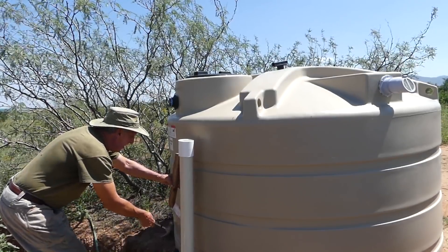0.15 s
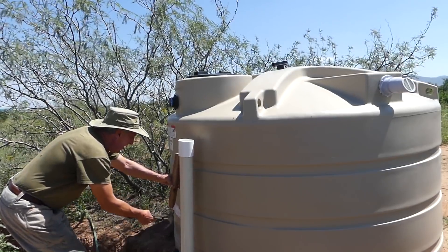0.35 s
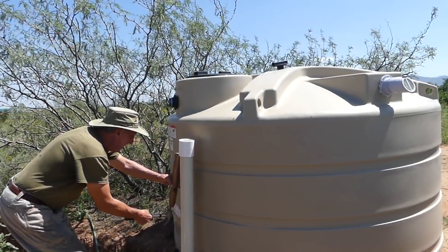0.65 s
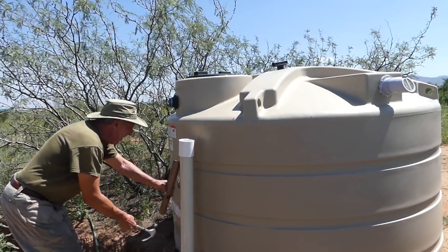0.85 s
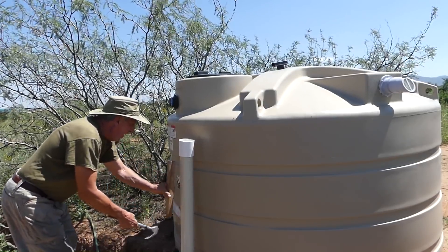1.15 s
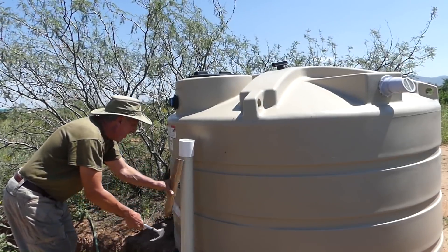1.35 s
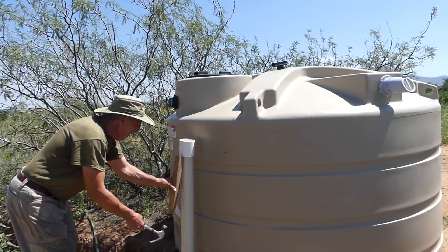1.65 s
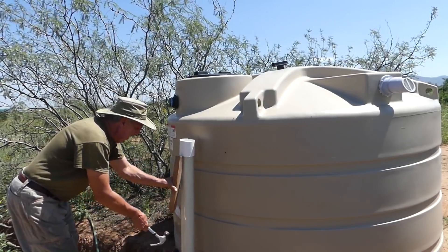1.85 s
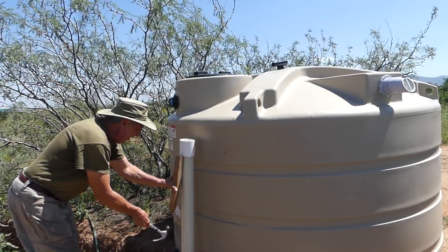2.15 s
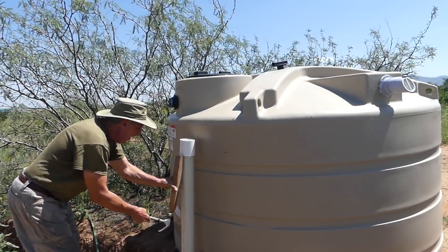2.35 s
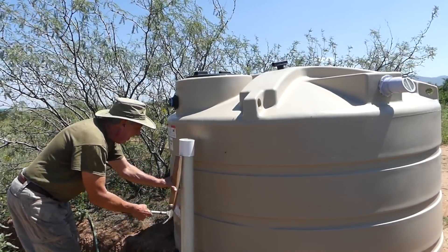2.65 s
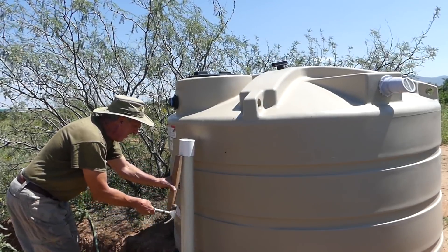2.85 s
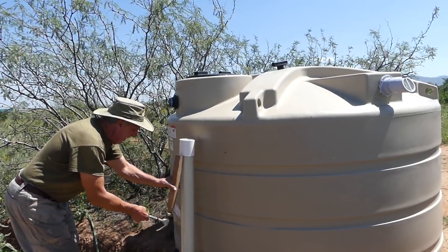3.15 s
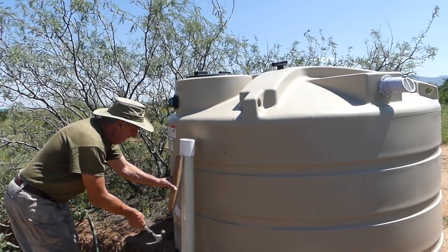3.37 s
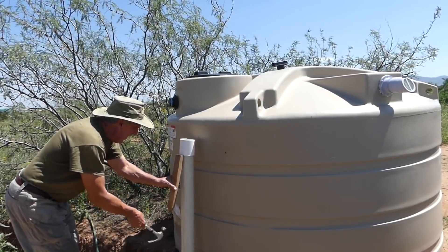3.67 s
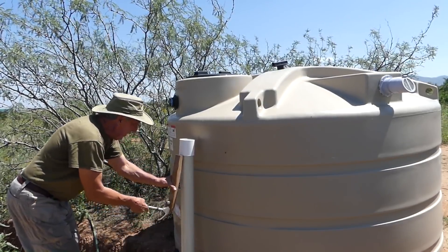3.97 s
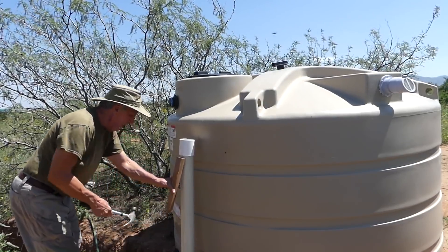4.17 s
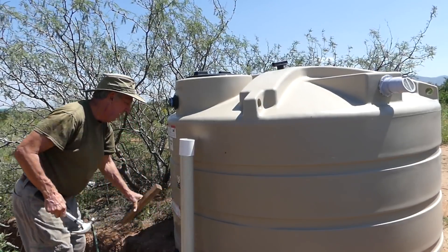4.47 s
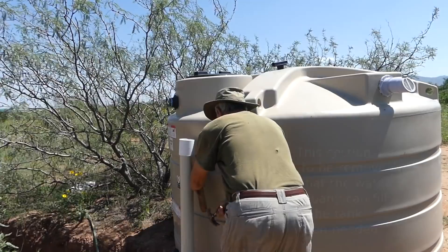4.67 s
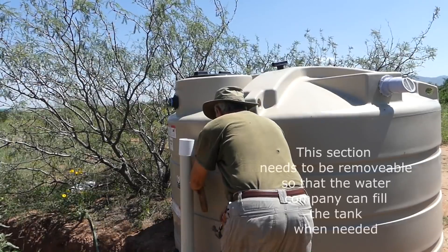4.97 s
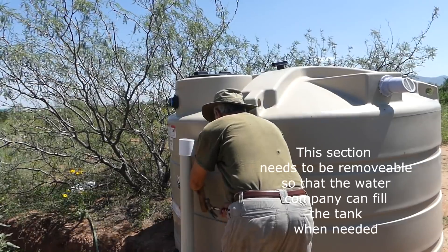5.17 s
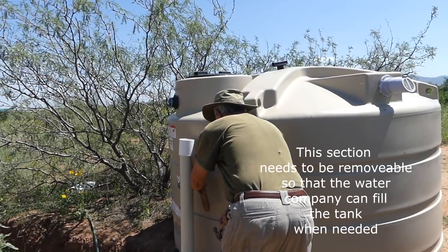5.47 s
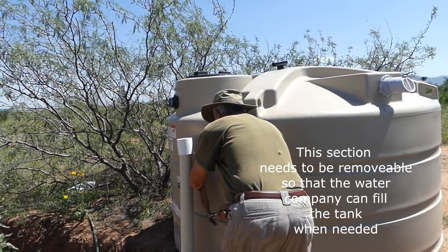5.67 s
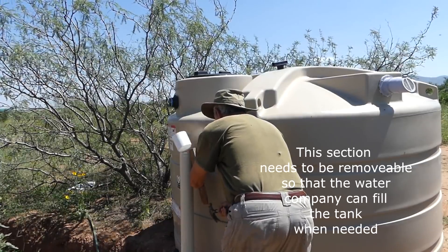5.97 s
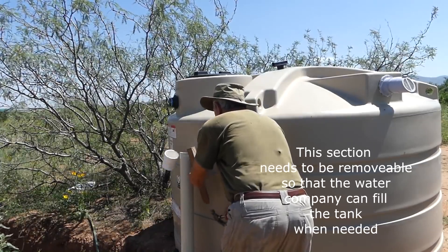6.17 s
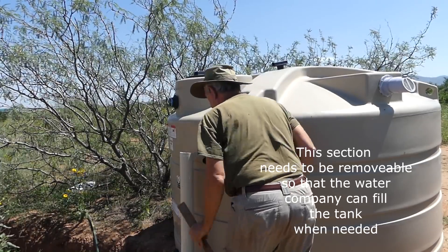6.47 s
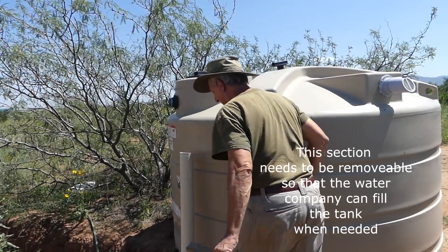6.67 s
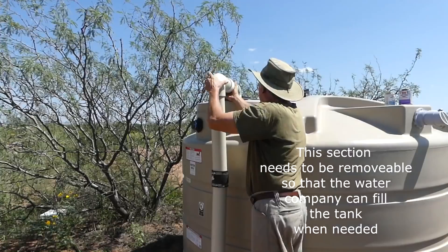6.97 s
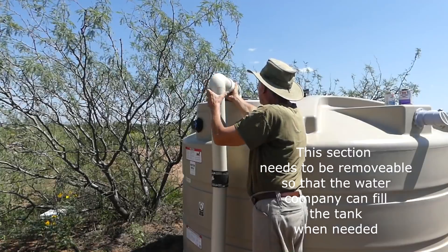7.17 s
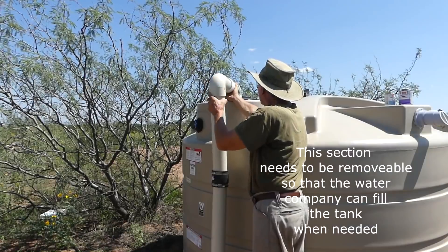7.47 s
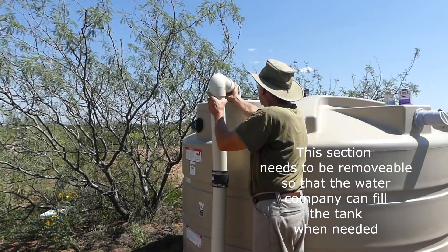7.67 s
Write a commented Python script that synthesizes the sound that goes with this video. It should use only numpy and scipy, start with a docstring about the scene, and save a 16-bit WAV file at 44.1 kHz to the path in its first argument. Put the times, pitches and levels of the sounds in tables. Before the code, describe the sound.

Hard hollow knocks on a plastic pipe outdoors, unevenly spaced with lighter taps between, over low wind rumble; a thud and clatter follow later.

```python
"""Knocking a stuck pipe fitting

Outdoors a hammer knocks a wooden block against a plastic pipe fitting beside a water tank.
Each blow adds short noises to ringing tones, and bright, thin echoes follow. Lighter taps fall between.
Boots scuff and things land, built from thuds and noise; wind, brush and ticks are shaped noise.
All this is in the left channel; the right holds little but hiss.
"""
import sys
import numpy as np
from scipy import signal
from scipy.fft import rfft, irfft, next_fast_len
from scipy.io import wavfile
from scipy.ndimage import uniform_filter1d, minimum_filter1d, map_coordinates

SR = 44100
rng = np.random.default_rng(int(sys.argv[2]) if len(sys.argv) > 2 else 0)


def put_to_file(sound):
    """Save the sound as 16-bit audio at rate SR, in the file named by the first command-line argument."""
    columns = np.atleast_2d(sound).T  # one column per channel
    safe = np.clip(columns, -1, 1)
    whole_steps = np.round(safe * 32767)
    wavfile.write(sys.argv[1], SR, whole_steps.astype(np.int16))


N = 345072
CLOCK = np.arange(N) / SR  # time through the whole scene, in seconds
AGE = np.arange(SR // 4) / SR  # time since a hit, in seconds

# Strength of the wind on the microphone. Each row: time in seconds, level in dB before BUFFET_DB.
WIND_LEVEL = [(0.0, -39.5), (0.15, -46), (1.48, -40.5), (2.26, -56), (2.46, -38.5), (2.5, -51),
              (3.33, -43.5), (3.59, -46), (4.14, -41.5), (4.22, -52.5), (4.66, -54.5), (4.81, -38.5),
              (5.27, -55.5), (5.38, -46), (5.71, -61), (6.32, -58), (6.51, -41), (6.93, -43.5), (7.01, -56),
              (7.82, -56.5)]
# Strength of the rustling. Each row: time in seconds, level in dB before each layer's own offset.
RUSTLE_LEVEL = [(0.0, -60.5), (3.05, -64), (3.55, -63.5), (4.51, -57), (4.73, -61), (6.27, -63),
                (6.64, -58.5), (7.01, -63.5), (7.82, -65)]
BUFFET_DB, BRUSH_DB = 10, 9.5  # added to the two curves above
# Colour of the wind on the microphone. Each row: frequency in Hz, relative level in dB per Hz.
BUFFET_COLOUR = [(8, -2.5), (22, 0), (45, -7), (90, -14), (160, -23.5), (280, -38), (600, -65.5),
                 (2000, -82)]
# Colour of the rustling brush. Each row: frequency in Hz, relative level in dB per Hz.
LEAVES_COLOUR = [(60, 2), (250, 1.5), (450, -1.5), (800, -5), (1200, -8.5), (2500, -14), (5500, -18),
                 (9000, -24), (16000, -31)]
# Colour of the hiss. Each row: frequency in Hz, relative level in dB per Hz.
HISS_COLOUR = [(20, -9), (400, -5.5), (1200, -10.5), (3000, -12.5), (6000, -12), (10000, -8), (14800, -5),
               (16000, -2.5)]
TOP_HZ = 15900  # nothing is left above this

# Blows and light taps on the fitting. Each row: start in seconds, contact pitch in Hz, contact level in dB,
# body centre in Hz, body level in dB, pipe wall level in dB, crack level in dB.
KNOCKS = [(0.2624, 1520, -26, 625, -21, -21.5, -30.5), (0.572, 1640, -17, 820, -22.5, -18.5, -22.5),
          (1.2783, 1340, -62, 690, -42, -61, -63), (1.4159, 1140, -73, 686, -51.5, -69, -70),
          (1.517, 890, -57, 590, -48, -65, -68), (1.9882, 1330, -19, 606, -22.5, -28.5, -30),
          (2.33, 1350, -17, 734, -24.5, -27, -29), (2.6656, 1020, -48.5, 805, -41, -54.5, -51.5),
          (3.176, 1400, -15, 910, -24.5, -24, -28.5), (3.4946, 1270, -23.5, 950, -22, -30, -26),
          (3.819, 1160, -57, 750, -47, -47, -54), (3.9237, 860, -43.5, 830, -42.5, -62, -63),
          (4.7212, 840, -65, 626, -43.5, -47, -60), (5.598, 910, -23.5, 837, -20, -25.5, -28.5),
          (5.9547, 1460, -30, 820, -21.5, -25.5, -24.5)]
# Low modes of the pipe. Each row: nominal pitch in Hz, relative level in dB,
# time to fall by 60 dB in seconds.
THUMP_MODES = [(179.6, -9.5, 0.1), (291, -7, 0.079), (366, 0, 0.077)]
THUMP_DB, THUMP_DB_PER_OCTAVE = -10, -6.5  # thump against the body; it weakens as the body's centre rises
MIDDLE_HZ = 738  # body centre of a blow in the middle of the block
# Block, fitting and pipe ringing together, before the tilt of each blow. Each row: nominal pitch in Hz,
# relative level in dB, time to fall by 60 dB in seconds.
BODY_MODES = [(519, 1.5, 0.075), (627.4, -12, 0.1), (716.3, -5, 0.082), (782, -5.5, 0.05), (881, -3, 0.046),
              (1057, -8.5, 0.07), (1214, 0, 0.0555), (1477, -11.5, .05), (1600, -23, 0.042),
              (1896, -11, 0.036)]
# Hollow noise of the body, before the same tilt. Each row: frequency in Hz, relative level in dB per Hz.
HOLLOW_COLOUR = [(150, -21.5), (400, -6), (600, 5.5), (1300, 2.5), (2050, -5), (2400, -21), (4000, -52.5)]
# Modes of the pipe wall. Each row: nominal pitch in Hz, relative level in dB,
# time to fall by 60 dB in seconds.
WALL_MODES = [(2553, 4, 0.039), (2633, 1, 0.067), (2750, 2.5, 0.045), (2935, -8, 0.04), (3076, -10, 0.023)]
# Broad ring of the pipe wall. Each row: frequency in Hz, relative level in dB per Hz.
SHELL_COLOUR = [(1700, -13), (2350, -5.5), (2700, 13), (3100, 0.5), (3700, -21.5)]
# Bright crack of a blow. Each row: frequency in Hz, relative level in dB per Hz.
CRACK_COLOUR = [(1500, -38), (3100, -1.5), (3900, -4.5), (4700, 1), (5300, 0), (5800, -0.5), (6500, 1.5),
                (7300, -9.5), (10000, -21.5), (16000, -45)]
# First snap of a hard blow. Each row: frequency in Hz, relative level in dB per Hz.
SNAP_COLOUR = [(600, -19.5), (1900, 15), (4000, -9), (7000, -6.5), (10000, -8.5), (16000, -32)]
# High modes of the rim. Each row: nominal pitch in Hz, relative level in dB,
# time to fall by 60 dB in seconds.
RIM_MODES = [(4620, 2.5, 0.036), (5250, -17.5, .04), (5720, -1.5, 0.048), (5960, -7, 0.056),
             (6100, -6.5, 0.051)]
# Colour of the echoes. Each row: frequency in Hz, relative level in dB.
ECHO_COLOUR = [(500, -4.5), (1500, -13.5), (3200, -3.5), (4600, -7.5), (5900, 5), (6600, -3), (8000, -7),
               (16000, -11)]

# Steps, things landing on the dirt, and one low wind thump at the start. Each row: start in seconds,
# thud pitch in Hz, thud level in dB, clatter level in dB, grit level in dB,
# base decay time in seconds that each part stretches or shortens.
LANDINGS = [(0.472, 181.8, -33, -62.5, -78, 0.14), (4.43, 337, -35.5, -46.5, -57, 0.085),
            (4.4545, 340, -50, -39.5, -44, 0.11), (4.493, 332, -42, -50.5, -50.5, 0.089),
            (6.461, 300, -77, -54, -49, 0.009), (6.596, 253, -31, -40, -35, 0.033),
            (6.603, 236, -26.5, -20, -25.5, 0.032)]
# Colour of a thud. Each row: multiple of its pitch, relative level in dB per Hz.
THUD_COLOUR = [(.3, -11), (.6, -4.5), (.8, -8), (1.25, 0), (1.9, -3.5), (3.998, -48)]
# Clatter of dropped things and scraping soles. Each row: frequency in Hz, relative level in dB per Hz.
CLATTER_COLOUR = [(300, -24), (600, -5), (820, 3), (1150, -2), (1450, -12), (1800, -9), (2250, -6.5),
                  (3100, -23.5), (6000, -50)]
# Fine grit. Each row: frequency in Hz, relative level in dB per Hz.
GRIT_COLOUR = [(1200, -19), (2700, -9), (3900, -3.5), (5600, -3), (6800, -9.5), (8000, -23.5), (16000, -23)]
# Boots dragging over dry dirt. Each row: start in seconds, time until release in seconds, grit level in dB,
# scrape level in dB.
SCUFFS = [(4.465, .095, -60, -53), (4.581, .03, -53.5, -60), (4.625, 0.041, -50.5, -58),
          (6.458, 0.045, -54, -55), (6.521, 0.028, -57, -44), (6.564, 0.03, -59, -52),
          (6.79, .03, -60.5, -54)]
SCUFF_ATTACK_S, SCUFF_RELEASE_S = 0.015, .01  # the sole bites, then lifts


def amp(db):
    """Turn decibels into a gain."""
    return 10 ** (np.asarray(db) / 20)


def unit(x):
    """Scale a steady sound to an average (rms) strength of 1."""
    return x / np.sqrt(np.mean(x ** 2) + 1e-20)


def blow(x):
    """Scale a hit so its whole energy equals 30 ms of sound at rms 1."""
    return x / np.sqrt(np.sum(x ** 2) / (.03 * SR) + 1e-20)


def curve(rows):
    """Join (seconds, value) rows with straight lines, one value per sample."""
    return np.interp(CLOCK, *np.transpose(rows))


def wobble(rate):
    """Make a smooth random curve through `rate` random points a second."""
    points = rng.standard_normal(int(N * rate / SR) + 4)
    return map_coordinates(points, [CLOCK * rate])


def noise(spectrum, size):
    """Make noise of rms 1, coloured by (Hz, dB) rows."""
    m = next_fast_len(size + 8192)
    hz, db = np.transpose(spectrum)
    log_hz = np.log(np.fft.rfftfreq(m, 1 / SR) + 1)
    gain = amp(np.interp(log_hz, np.log(hz), db))
    coloured = irfft(rfft(rng.standard_normal(m)) * gain, m)
    return unit(coloured[:size])


def fade(t60):
    """Die away freely after a contact, falling 60 dB in t60 seconds."""
    return np.exp(-np.log(1000) * AGE / t60)


def rise(attack):
    """Swell up at the start of a contact, with a time constant in seconds."""
    return 1 - np.exp(-AGE / attack)


def add(track, s, x):
    """Mix x into the track at time s in seconds."""
    part = track[round(s * SR):][:len(x)]
    part += x[:len(part)]


def wind():
    """Gusts buffet the microphone as low noise; brush rustles with its own brighter noise."""
    gusts = unit(noise(BUFFET_COLOUR, N) * amp(2.5 * wobble(18)))
    buffet = amp(curve(WIND_LEVEL) + BUFFET_DB) * gusts
    brush_gain = amp(curve(RUSTLE_LEVEL) + BRUSH_DB + 1.5 * wobble(25))
    return buffet + brush_gain * noise(LEAVES_COLOUR, N)


def rustles(count=130):
    """Clothes and twigs give scattered ticks of narrow noise, following the rustle level."""
    out, level = np.zeros(N), curve(RUSTLE_LEVEL)
    for when, pitch, size in rng.random((count, 3)):
        hz = 550 * 5 ** pitch
        colour = [(hz / 2, -25), (hz, 0), (hz * 2, -20)]
        tick = blow(noise(colour, len(AGE)) * rise(0.0011) * fade(.03))
        tick_db = level[int(when * N)] - 7.5 + 15 * size ** 2 - 4 * pitch  # higher ticks are weaker
        add(out, when * N / SR, amp(tick_db) * tick)
    return out


def ring(modes, scatter_db):
    """Damped modes, struck at new strengths; each pitch wavers slightly at random, for a rougher ring."""
    hz, db, t60 = np.transpose(modes)[:, :, None]
    size, phase, detune = rng.standard_normal((3, len(modes), 1))
    knots = np.arange(0, 1, 1 / 150)
    drifts = rng.standard_normal((len(modes), len(knots)))
    waver = np.array([np.interp(AGE, knots, row) for row in drifts])
    waver_cycles = .2 * np.minimum(hz / 2700, 1) * waver  # lower modes waver less
    cycles = hz * (1 + .01 * detune) * AGE + phase + waver_cycles
    tones = amp(db + scatter_db * size) * fade(t60) * np.sin(2 * np.pi * cycles)
    return blow(np.sum(tones, 0))


def lean(rows, centre_hz):
    """Where the block is struck favours the low or the high part of the body."""
    slope_db = 10.3 * np.log2(centre_hz / MIDDLE_HZ)  # dB per octave
    tilted = []
    for hz, db, *rest in rows:
        octaves = np.log2(max(hz, 450) / MIDDLE_HZ)
        tilted.append((hz, db + slope_db * octaves, *rest))
    return tilted


def knocks():
    """A blow starts a few cycles of contact, low thump, hollow body, pipe wall and a bright crack."""
    out = np.zeros(N)
    for s, hz, contact_db, centre_hz, body_db, wall_db, crack_db in KNOCKS:
        hard = np.clip((contact_db + 51.5) / 25, 0, 1)  # light taps start softly and ring cleanly
        swell = rise(0.00034 + .002 * (1 - hard))
        contact = blow(np.sin(2 * np.pi * hz * AGE) * rise(0.0012) * fade(0.0035))

        thump_db = body_db + THUMP_DB + THUMP_DB_PER_OCTAVE * np.log2(centre_hz / MIDDLE_HZ)
        thump = blow(ring(THUMP_MODES, scatter_db=1.0) * rise(.001))

        hollow = blow(noise(lean(HOLLOW_COLOUR, centre_hz), len(AGE)) * fade(0.06))
        body = ring(lean(BODY_MODES, centre_hz), scatter_db=3.5) + (0.28 + 0.55 * hard) * hollow
        body = blow(body * rise(0.0023))  # the long pipe takes a moment to fill

        shell = blow(noise(SHELL_COLOUR, len(AGE)) * fade(0.019))
        wall = blow((ring(WALL_MODES, scatter_db=3.5) + 1.4 * hard * shell) * swell)

        burst_fade = fade(0.022) + 0.16 * fade(0.089)
        burst = blow(noise(CRACK_COLOUR, len(AGE)) * swell * burst_fade)
        snap = blow(noise(SNAP_COLOUR, len(AGE)) * swell * fade(0.0081))
        rim = amp(-10) * ring(RIM_MODES, scatter_db=2.0)
        crack = burst + rim + hard * snap

        low = amp(contact_db) * contact + amp(thump_db) * thump + amp(body_db) * body
        high = amp(wall_db) * wall + amp(crack_db) * crack
        add(out, s, low + high)
    return out


def echoes(x):
    """Far surfaces return thin, bright copies; the brush scatters a faint tail."""
    answer = amp(-38) * noise(ECHO_COLOUR, len(AGE)) * fade(0.4) / np.sqrt(SR * 0.028)
    for delay, db in [(.079, -40), (.092, -47), (.0955, -41.5)]:  # seconds, dB
        smear = noise(ECHO_COLOUR, len(AGE)) * fade(.006)
        add(answer, delay, amp(db) * smear / np.linalg.norm(smear))
    return signal.fftconvolve(x, answer)[:N]


def landings():
    """A landing gives a dull thud, a clatter and a spray of grit."""
    out = np.zeros(N)
    for s, hz, thud_db, clatter_db, grit_db, t60 in LANDINGS:
        bump = blow(np.sin(2 * np.pi * hz * AGE) * fade(2.0 * t60))
        colour = [(hz * ratio, db) for ratio, db in THUD_COLOUR]
        soft = blow(noise(colour, len(AGE)) * rise(0.0012) * fade(1.74 * t60))
        thud = blow(bump + 0.97 * soft)
        clatter = blow(noise(CLATTER_COLOUR, len(AGE)) * rise(0.00021) * fade(1.26 * t60))
        grains = amp(2.5 * wobble(910)[:len(AGE)])
        grit = blow(noise(GRIT_COLOUR, len(AGE)) * grains * rise(0.00015) * fade(0.74 * t60))
        add(out, s, amp(thud_db) * thud + amp(clatter_db) * clatter + amp(grit_db) * grit)
    return out


def stroke(start, length):
    """Shape one drag of the sole: attack, hold, release."""
    attack = np.clip((CLOCK - start) / SCUFF_ATTACK_S, 0, 1)
    release = np.exp(-np.maximum(CLOCK - start - length, 0) / SCUFF_RELEASE_S)
    return attack * release


def scuffs():
    """Grains of dirt crunch in clumps under a boot while the sole scrapes."""
    grit = unit(noise(GRIT_COLOUR, N) * amp(3.0 * wobble(450)))
    scrape = unit(noise(CLATTER_COLOUR, N) * amp(4.0 * wobble(90)))
    out = np.zeros(N)
    for start, length, grit_db, scrape_db in SCUFFS:
        out += stroke(start, length) * (amp(grit_db) * grit + amp(scrape_db) * scrape)
    return out


def scene():
    """Everything reaches the left channel and barely leaks into the right."""
    hits = knocks() + landings()
    left_right = amp([[0], [-50]])
    return left_right * (wind() + rustles() + hits + echoes(hits) + scuffs())


def limit(x, ceiling, size):
    """Duck the gain smoothly for an instant (size in samples) around any peak above the ceiling."""
    need = ceiling / np.maximum(np.abs(x).max(0), ceiling)
    return x * uniform_filter1d(minimum_filter1d(need, size), size)


def record(dry):
    """Add preamplifier hiss, limit the peaks and cut everything from TOP_HZ up."""
    own = np.array([noise(HISS_COLOUR, N), noise(HISS_COLOUR, N)])  # separate in each channel
    shared = noise([(3000, -22), (6000, -13.5), (10000, -8.5), (14800, -2.0), (16000, -5.5)], N)
    x = dry + amp(-61.5) * own + amp(-60.5) * shared
    x = limit(x, ceiling=.93, size=31)
    m = next_fast_len(N + 8192)
    keep = np.fft.rfftfreq(m, 1 / SR) < TOP_HZ
    return irfft(rfft(x, m) * keep, m)[:, :N]


dry = scene()
out = record(dry)
put_to_file(out)
```